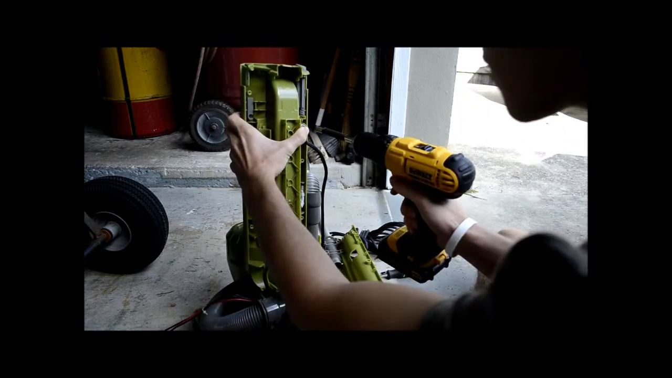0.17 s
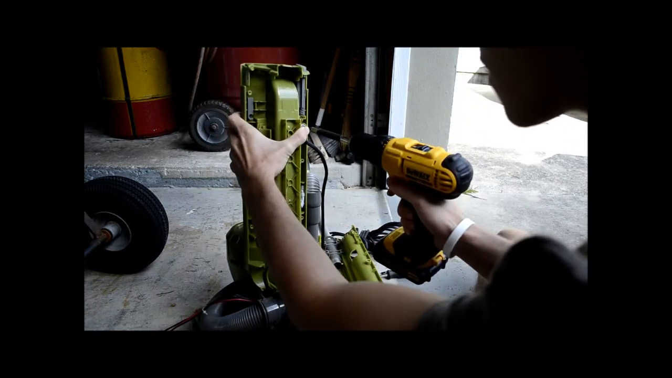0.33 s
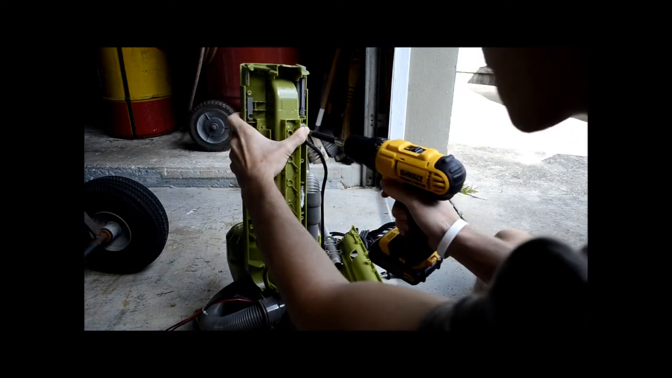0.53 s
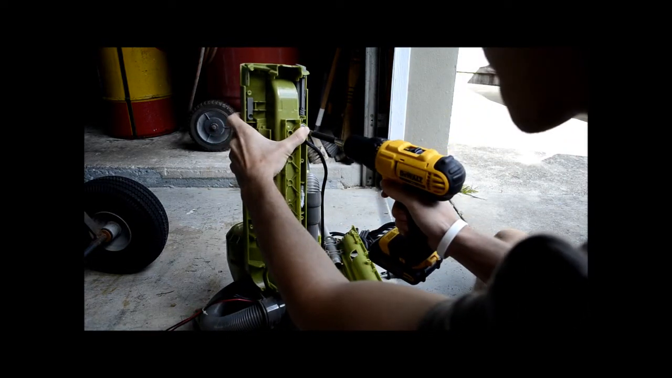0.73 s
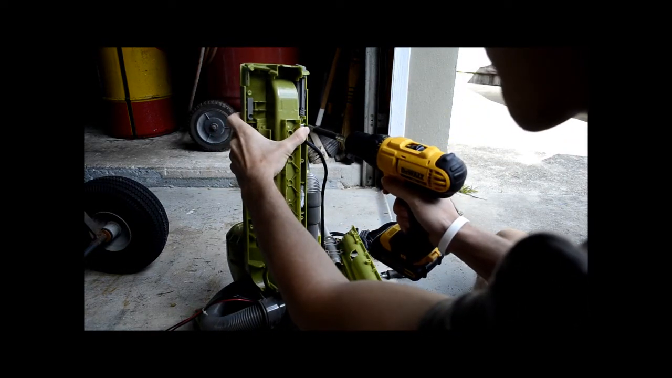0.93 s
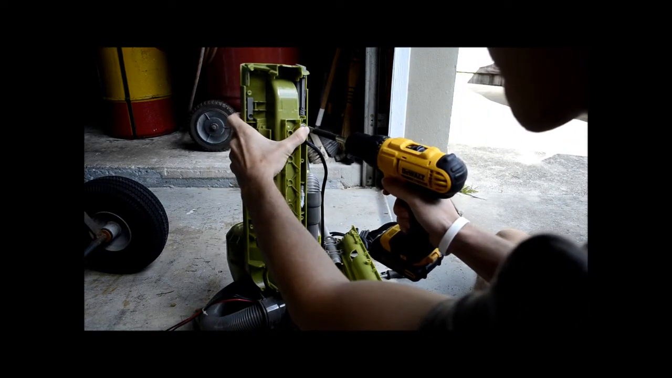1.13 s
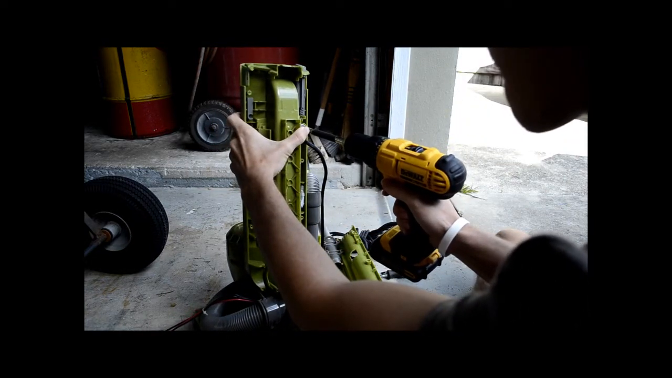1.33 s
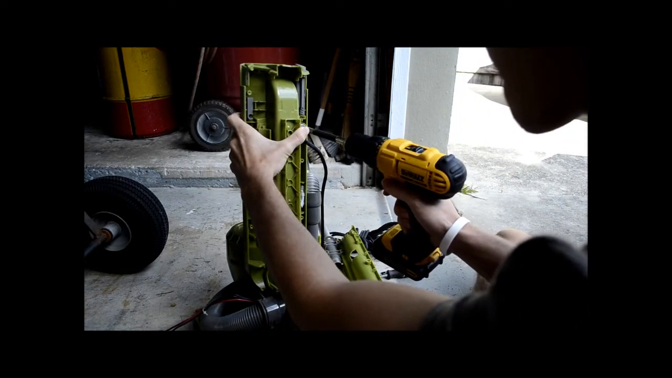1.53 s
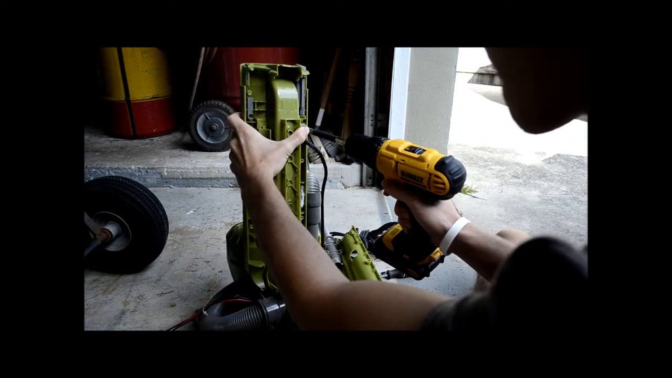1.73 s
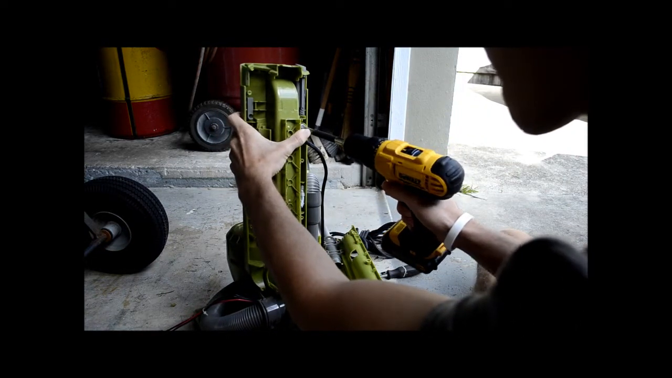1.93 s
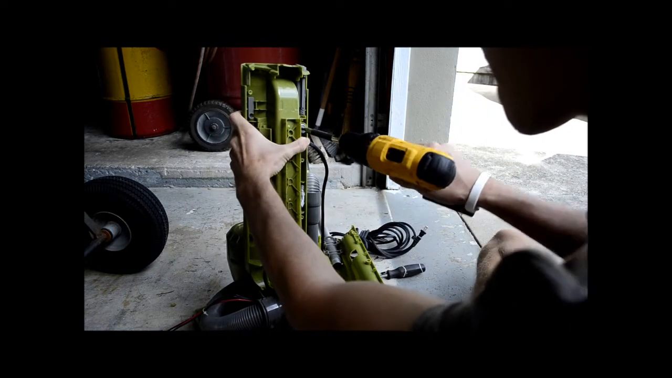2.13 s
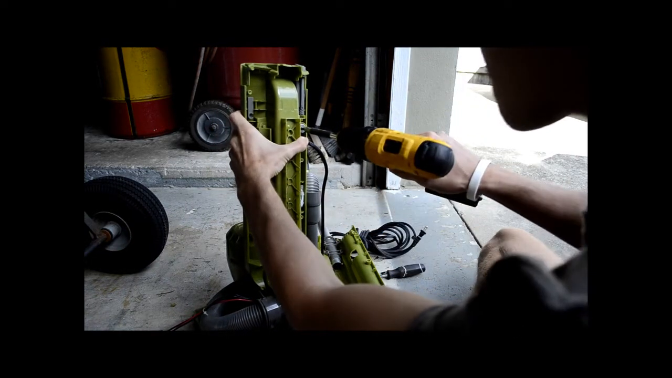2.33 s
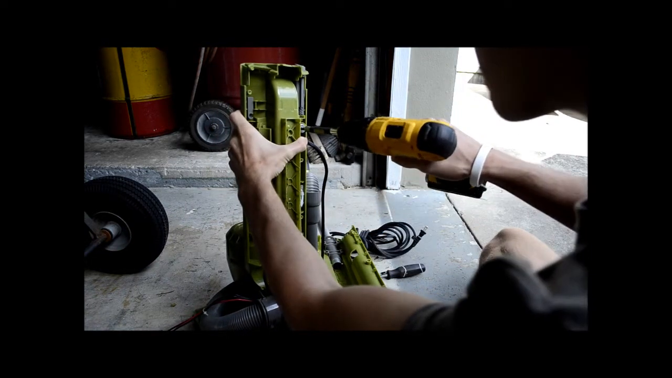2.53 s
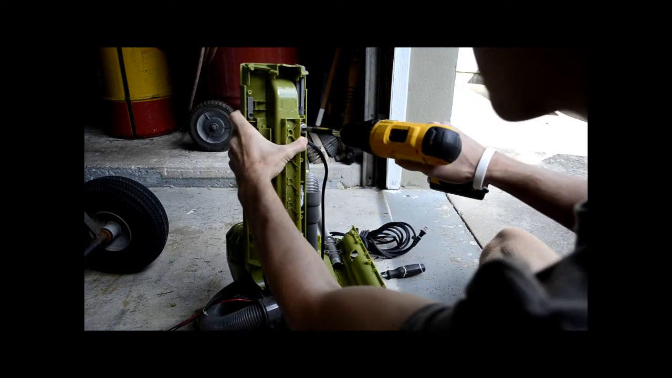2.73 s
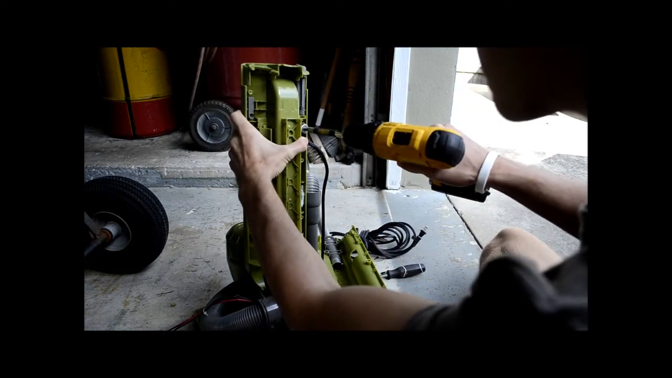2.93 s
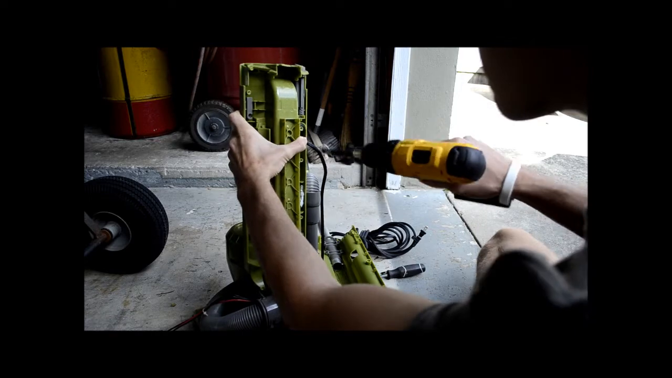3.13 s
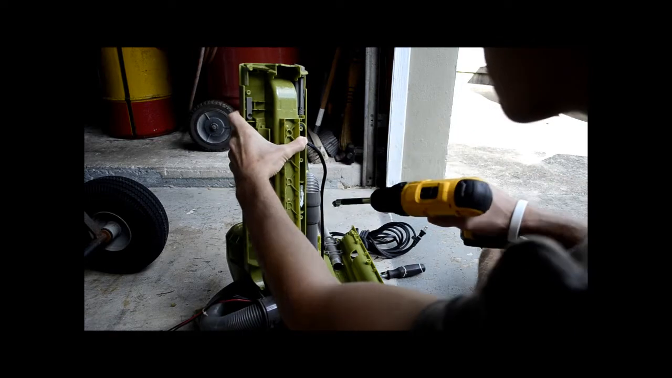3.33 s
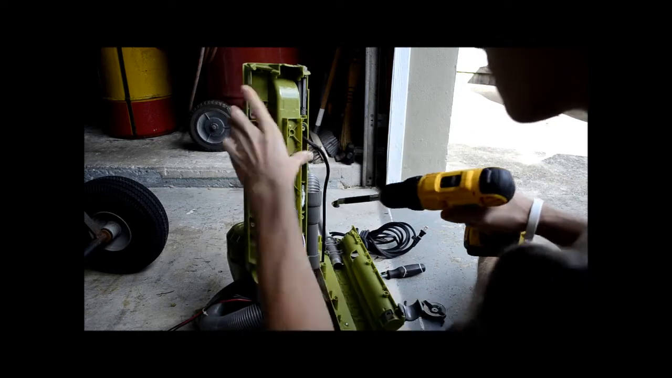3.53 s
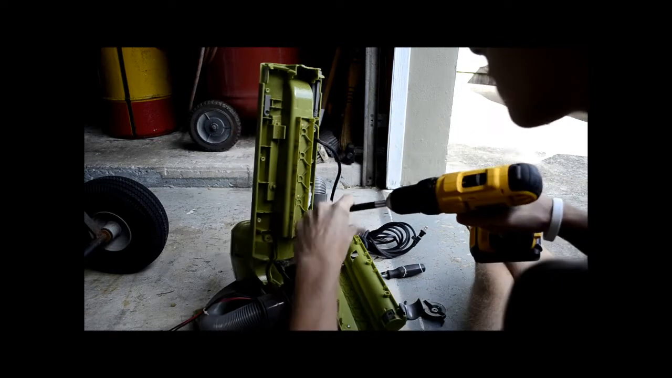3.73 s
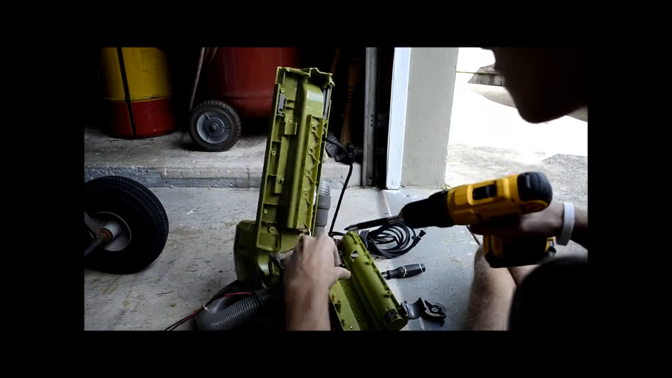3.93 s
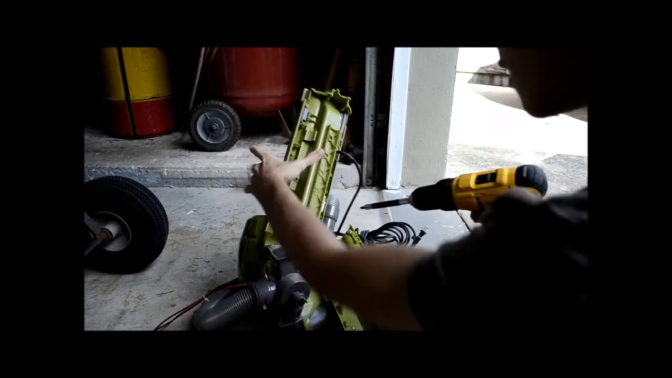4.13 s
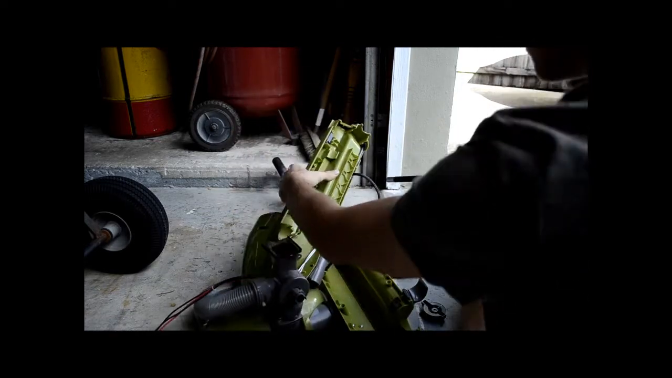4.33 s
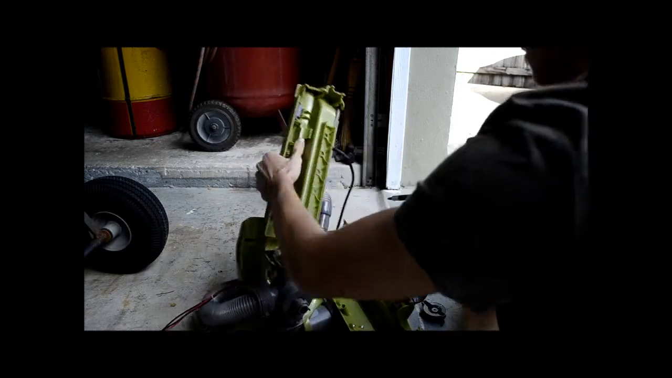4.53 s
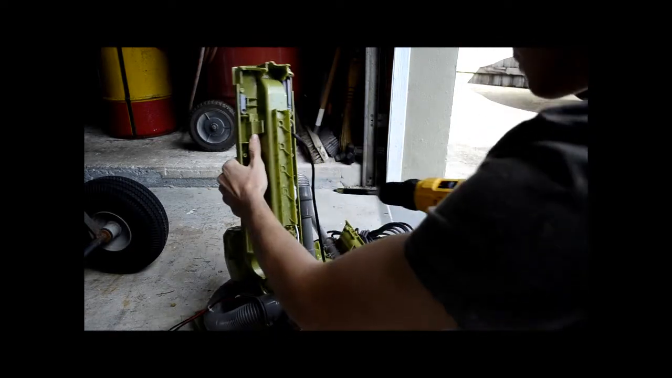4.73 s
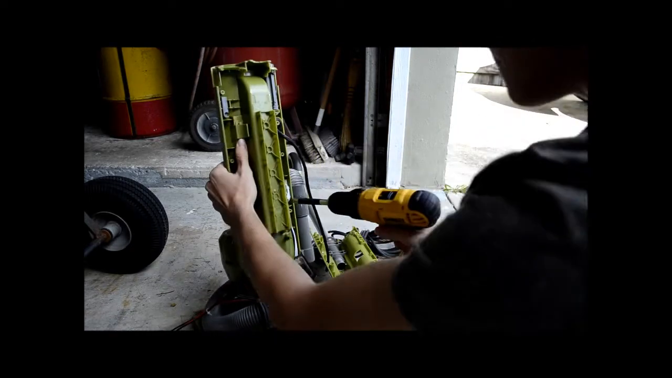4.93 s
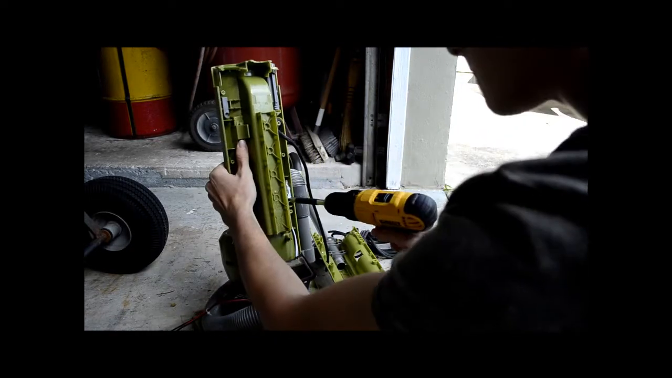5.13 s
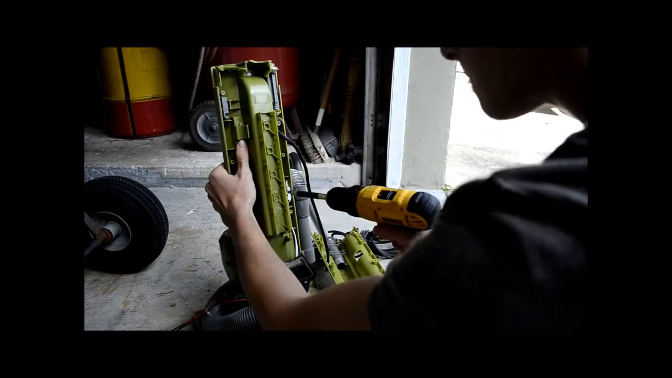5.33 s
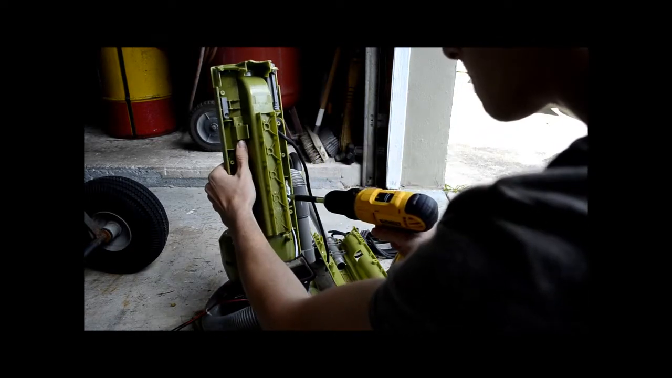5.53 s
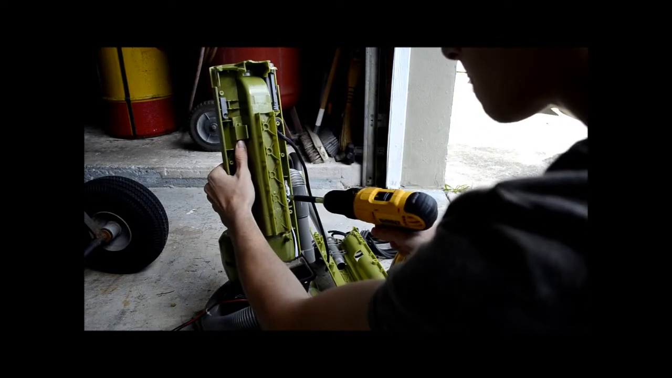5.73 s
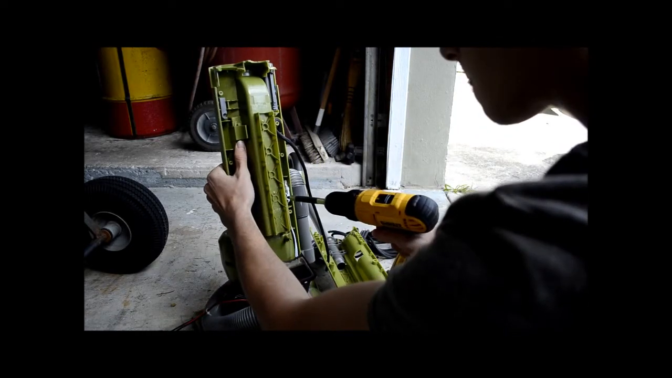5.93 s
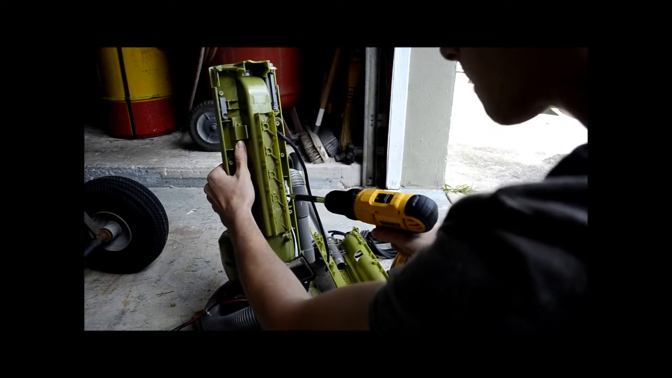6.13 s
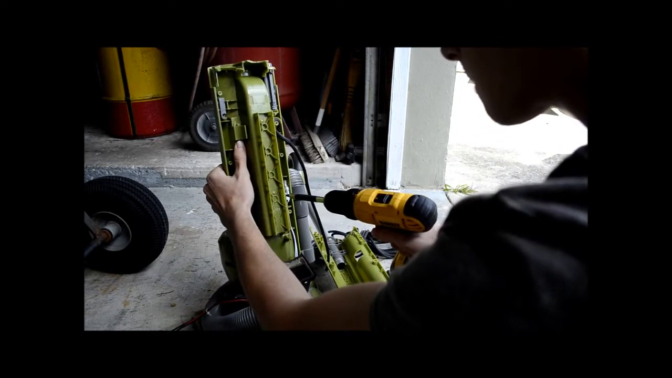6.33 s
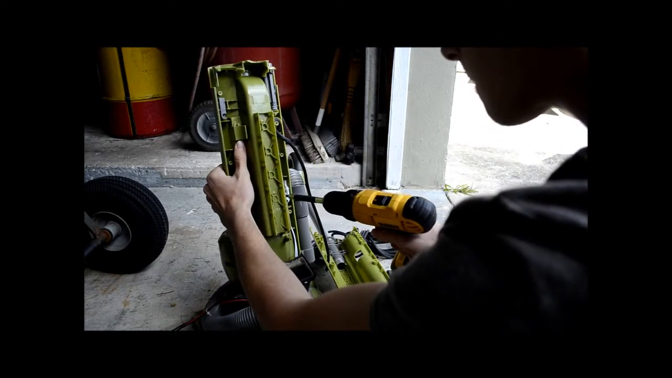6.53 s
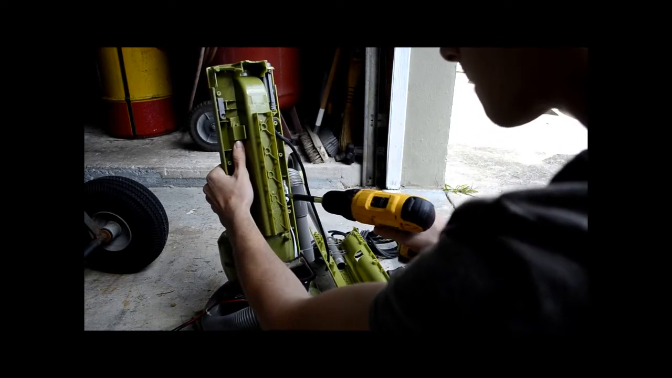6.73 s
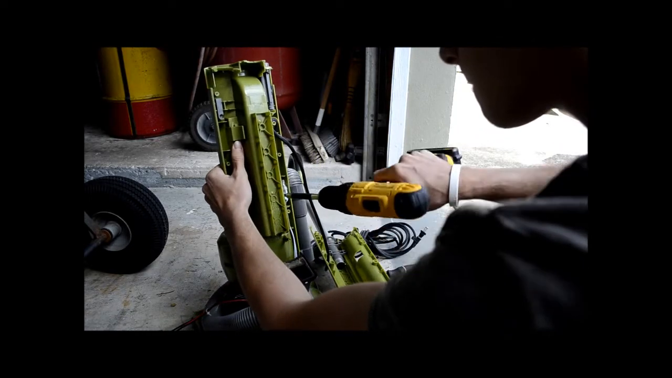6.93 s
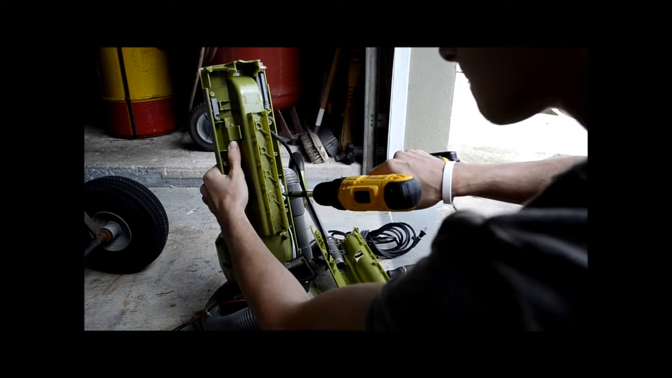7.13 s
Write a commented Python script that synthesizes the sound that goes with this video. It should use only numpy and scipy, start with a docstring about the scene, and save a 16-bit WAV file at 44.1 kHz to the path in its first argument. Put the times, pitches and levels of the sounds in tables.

```python
"""A cordless drill backs a screw out of a garden tool's plastic housing on a garage floor, in two bursts.
Its gear teeth rasp and its rotor sounds harmonics of the turning speed. The bit knocks about in the screw
heads, exciting the modes of the hollow housing. Between the bursts the housing is tipped: it scrapes over
the concrete by stick-slip friction and rattles a loose metal part. The garage reverberates briefly,
and a machine hums steadily behind it all, with outdoor air coming through the open door."""
import sys
import numpy as np
from scipy import signal
from scipy.fft import rfft, irfft
from scipy.io import wavfile
from scipy.ndimage import uniform_filter1d, map_coordinates

SR = 44100
rng = np.random.default_rng(int(sys.argv[2]) if len(sys.argv) > 2 else 0)


def pcm_store(signal):
    """Save signal as 16-bit PCM."""
    levels = np.round(np.clip(np.atleast_2d(signal), -1, 1) * 32767)
    wavfile.write(sys.argv[1], SR, levels.astype(np.int16).T)


N = 316197
TIME = np.arange(N) / SR


# Trigger pulls: pressed_s, released_s, squeeze_s, time_constant_s, gear_db, whine_re_gear_db, controller_db
TRIGGER_PULLS = [(2.452, 2.992, .004, .055, -29, -12, -38), (7.004, 7.4, 0.063, 0.061, -29.5, -6.5, -47.5)]

def motor(top_turns_per_s=325, ease_s=.12, sag_turns_per_s2=390, brake_s=.05, grind_db=3, idle_share=.46):
    """First-order lag: the rotor nears top speed, sags as the finger eases, then brakes with a grind."""
    turns_per_s, gain = 0, 0
    for pressed, released, squeeze_s, time_constant_s, gear_db, *_ in TRIGGER_PULLS:
        since = np.maximum(TIME - pressed, 0)
        rise = top_turns_per_s * (1 - np.exp(-since / time_constant_s))
        sag = sag_turns_per_s2 * np.maximum(TIME - released + ease_s, 0)
        unbraked = np.clip(1 - (TIME - released) / brake_s, 0, 1)
        speed = np.maximum(rise - sag, 0) * unbraked
        squeeze = np.minimum(since / squeeze_s, 1)
        drive = squeeze * np.sqrt(unbraked) * from_db(gear_db + grind_db * (TIME > released))
        turns_per_s += speed
        gain += drive * (idle_share + (1 - idle_share) * (speed / top_turns_per_s) ** 2)
    return turns_per_s, gain


# Tones of rotor, gears and commutator: cycles_per_turn, level_re_gear_db
ROTOR_ORDERS = [(3, -18), (4, -16), (5, -13), (7, -21), (12, -22), (16, -26), (20, -29), (24, -31),
                (26, -27), (31, -25), (32, -29), (35, -29), (41, -35)]
# Spectrum of the tooth impacts: frequency_hz, gain_db
GEAR_SPECTRUM = [(200, -23), (320, -17), (550, -10), (750, -15.5), (1000, -7), (1250, -13.5), (1700, -9),
                 (2200, -7), (3500, -16.5), (5000, -17), (6000, -22.5), (10500, -19.5), (13000, -26),
                 (16000, -36)]
# Resonances of the drill's casing, gearbox and rotor: centre_hz, bandwidth_hz, gain_db
CASING_MODES = [(1290, 230, -3), (1510, 79, 5), (2620, 330, -7.5), (3190, 70, 5), (3730, 60, -22),
                (4970, 480, -6), (8700, 90, -9.5)]
GEARBOX_MODES = [(1405, 30, 18.5)]
ROTOR_MODES = [(10062, 90, 5)]

def drill(rasp_db=-5, throb=0.06, flutter=0.18):
    """Forced vibration: gear teeth shake the casing; one rotor harmonic squeals as it meets a resonance."""
    turns_per_s, gain = motor()
    angle = phase_of(turns_per_s * (1 + .0016 * drift(120)))
    mesh = np.maximum(np.cos(4 * angle), 0) ** 2
    impacts = 2 * mesh * grains(per_s=9000, spread_db=2.1)
    teeth = (impacts + from_db(rasp_db) * rng.standard_normal(N)) * (1 + throb * np.cos(angle))
    gears = rms_one(resonate(colour(teeth, GEAR_SPECTRUM), CASING_MODES + GEARBOX_MODES))
    tones = sum(from_db(db) * np.sqrt(2) * np.sin(order * angle) * (1 + flutter * drift(35))
                for order, db in ROTOR_ORDERS)
    return gain * (gears + resonate(tones, ROTOR_MODES))


def gear_strain(overtone_db=-9, width_hz=1300, full_strain_turns_per_s2=1200):
    """Inertial load: accelerating gears add a rising whine, made raspy by random modulation."""
    turns_per_s, gain = motor()
    acceleration = np.clip(np.gradient(turns_per_s) * SR / full_strain_turns_per_s2, 0, 1)
    pulled = sum(from_db(whine_db) * (TIME >= pressed) * (TIME < released)
                 for pressed, released, *_, whine_db, _ in TRIGGER_PULLS)
    strain = uniform_filter1d(np.sqrt(acceleration) * pulled, size=600)
    mesh_phase = phase_of(12 * turns_per_s)
    whine = 0
    for k in (1, 2):
        partial = drift(width_hz) * np.cos(k * mesh_phase) + drift(width_hz) * np.sin(k * mesh_phase)
        whine += from_db(overtone_db * (k - 1)) * partial
    return gain * strain * whine


def controller(chop_hz=3905, attack_s=0.0032, t60_s=0.11):
    """Magnetic force: chopped current makes the windings sing briefly at the start of each pull."""
    envelope = 0
    for pressed, *_, db in TRIGGER_PULLS:
        since = np.maximum(TIME - pressed, 0)
        envelope += np.minimum(since / attack_s, 1) * from_db(db - 60 * since / t60_s)
    return envelope * three_harmonics(2 * np.pi * chop_hz * TIME, step_db=-16)


# The spindle takes up its play, then clacks when braked: start_s, level_db, hardness_db
SPINDLE_CLACKS = [(2.4655, -29.5, -2), (2.9925, -19, -0.5), (2.9965, -29, 8), (3.0105, -36, -6),
                  (3.018, -23.5, -8)]

def spindle():
    """Backlash: the steel dogs of the spindle lock hit their stops with short, hard clacks."""
    clacks = by_hardness(SPINDLE_CLACKS, thud_db=-17.5, snap_db=-13.5)
    return contacts(clacks, thud_hz=330, body_hz=875, bright_hz=2380, snap_hz=4900,
                    t60_s=0.027, snap_t60_s=.035, crack=0.99, snap_ratio=2.1)


# Bit, hand and floor knock the plastic: start_s, relative_level_db, hardness_db
PLASTIC_KNOCKS = [(0.4884, -35, -6.5), (0.9648, -42.5, 5.5), (1.3005, -44.5, -6), (1.4003, -47, -4),
                  (1.6233, -46, -3), (2.113, -39, 3), (2.1202, -30, 3), (2.8045, -25, -2), (3.1, -45, -11),
                  (3.4088, -48.5, 4), (3.686, -48, -8), (3.7889, -49, 5), (3.9675, -43.5, 16),
                  (4.08, -38.5, 5), (4.1585, -38, 7), (4.2204, -24.5, -3.5), (4.413, -27, -2),
                  (4.8051, -38, -11), (4.817, -34, -7), (5.4032, -36.5, -5), (5.5319, -49.5, -3),
                  (6.2109, -37.5, -2.5), (6.385, -47.5, -4), (6.5766, -45, 7.5), (6.772, -36, -1),
                  (6.7791, -37, 2), (6.802, -41.5, -12), (6.8938, -39.5, 10)]
# Resonances of the hollow housing: centre_hz, bandwidth_hz, gain_db
HOUSING_MODES = [(400, 33, -14), (559, 50, -9), (710, 153, 4), (1050, 210, 1.5), (1343, 43, 4.5),
                 (1640, 74, 1), (2500, 58, -16), (2940, 86, -7), (3530, 110, -5), (4220, 90, -12)]

def plastic(gain_db=-2.5, ticks_per_s=1.5, tick_db=-56, spread_db=3):
    """Impact excitation: knocks and faint ticks of the shifting grip ring the housing's damped modes."""
    chance = rng.random((int(ticks_per_s * N / SR), 2))
    ticks = [(when * N / SR, tick_db + spread_db * (2 * size - 1), 0) for when, size in chance]
    hits = by_hardness(PLASTIC_KNOCKS + ticks, thud_db=-6, snap_db=-17)
    knocks = contacts(hits, thud_hz=249, body_hz=800, bright_hz=2290, snap_hz=4005,
                      t60_s=0.075, snap_t60_s=0.064, crack=2.48, snap_ratio=2.65)
    return from_db(gain_db) * resonate(knocks, HOUSING_MODES)


# The loose metal part strikes: start_s, level_db, thud_re_level_db, snap_re_level_db, ping_hz, ping_db
METAL_STRIKES = [(4.097, -27, -26, -14, 4210, -28.5), (4.3347, -37.5, 7, 0, 10220, -28),
                 (4.4571, -16.5, -12.5, -7.5, 7470, -32), (4.5586, -33.5, -13, -12, 3470, -32),
                 (4.582, -30, -24, -17, 3430, -44), (4.6423, -33.5, -13, -13, 3230, -49),
                 (4.6856, -37.5, 5, -16.5, 3400, -53), (4.7579, -40, -7, -17.5, 3770, -45)]
# Modes of the whole part: pitch_hz, relative_level_db, t60_s
METAL_MODES = [(680, -10, .3), (769, -9, 0.11), (967, -12, .35), (1057, -8, .27), (1364, -23, .5),
               (1680, -15.5, .5), (1800, -10, 0.42), (2260, -25.5, 0.54), (2540, -12, .25),
               (2880, -15, 0.25), (3380, -23, .5), (3560, -13.5, 0.34), (4300, -20.5, 0.33),
               (5270, -22.5, 0.22)]

def metal(ring_db=-5, scatter_db=2.5, ping_cycles=250, ping_split=0.04):
    """Free vibration: each struck spot pings with a close pair of modes and the whole part rings on."""
    out = contacts([row[:4] for row in METAL_STRIKES], thud_hz=301, body_hz=776, bright_hz=3500,
                   snap_hz=6910, t60_s=0.079, snap_t60_s=0.04, crack=0.89, snap_ratio=1.66)
    for start_s, *_, ping_hz, ping_db in METAL_STRIKES:
        click, t60_s = clicks_at(start_s, ping_db), ping_cycles / ping_hz
        out += ring(click, ping_hz * (1 - ping_split), t60_s)
        out -= ring(click, ping_hz * (1 + ping_split), t60_s)
    starts_s, levels_db, *_ = np.transpose(METAL_STRIKES)
    for hz, mode_db, t60_s in METAL_MODES:
        excitation_db = levels_db + mode_db + ring_db + scatter_db * rng.standard_normal(len(starts_s))
        out += ring(clicks_at(starts_s, excitation_db), hz, t60_s)
    return out


# The housing slides over the concrete: start_s, swell_s, peak_db, t60_s
HOUSING_SLIDES = [(4.158, 0.078, -18, 0.26), (4.409, 0.026, -22.5, 0.11)]
# Spectrum of the friction: frequency_hz, gain_db
FRICTION_SPECTRUM = [(130, -23.5), (230, -2.5), (330, -3.5), (500, -8.5), (700, 5), (1100, -1.5),
                     (1600, -5), (2500, -11), (3500, -17), (6000, -31), (10000, -36.5), (15000, -48.5)]
# Resonances of the whole garden tool: centre_hz, bandwidth_hz, gain_db
TOOL_MODES = [(396, 39, -2), (714, 19, 3.5), (794, 19.8, -29.5), (1020, 100, 4), (1394, 77, 9),
              (1673, 19, -1)]

def scrape(grit_db=-6, swell_db=13.5):
    """Stick-slip friction: plastic catches on gritty concrete and shakes the tool, swelling and dying."""
    push = 0
    for start_s, swell_s, peak_db, t60_s in HOUSING_SLIDES:
        past_peak = TIME - start_s - swell_s
        envelope_db = np.minimum(swell_db * past_peak / swell_s, -60 * past_peak / t60_s)
        push += (TIME >= start_s) * from_db(peak_db + envelope_db)
    slips = grains(per_s=1600, spread_db=2.58) + from_db(grit_db) * rng.standard_normal(N)
    return push * rms_one(resonate(colour(slips, FRICTION_SPECTRUM), TOOL_MODES))


def judder(start_s=4.11, length_s=0.16, peak_db=-40.5, start_hz=150.5, rise_hz_per_s=179, jitter=0.0366):
    """Relaxation oscillation: the housing's foot sticks and slips ever faster, making a low groan."""
    since = np.clip(TIME - start_s, 0, length_s)
    slip_hz = (start_hz + rise_hz_per_s * since) * (1 + jitter * drift(60))
    arch = np.sin(np.pi * since / length_s)
    return from_db(peak_db) * arch * rms_one(three_harmonics(phase_of(slip_hz), step_db=-8))


# Reverberation time of the garage: frequency_hz, t60_s
GARAGE_DECAY = [(200, 0.33), (1000, 0.33), (4000, 0.25), (12000, 0.21)]

def garage(x, wet_db=-8, build_s=0.0028):
    """Reverberation: diffuse reflections build up and decay exponentially, sooner in the treble."""
    t, response = np.arange(SR * 3 // 4) / SR, 0
    edges_hz = np.geomspace(125, 16000, 8)
    for low, high in zip(edges_hz, edges_hz[1:]):
        t60_s = at_hz(GARAGE_DECAY, np.sqrt(low * high))
        response += band(rng.standard_normal(len(t)), low, high) * from_db(-60 * t / t60_s)
    response *= np.minimum(t / build_s, 1)
    return x + from_db(wet_db) * signal.fftconvolve(x, response / np.linalg.norm(response))[:N]


# Partials of the humming machine: pitch_hz, level_db, unsteadiness_ratio
HUM_PARTIALS = [(65.8, -61, 0.79), (81, -61, 0.53), (89.3, -49.5, 0.097), (118.8, -57.5, 0.46),
                (292.2, -61, 0.64), (628, -60, 0.94)]

def machine_hum():
    """Random modulation: each partial of the hum wavers in amplitude and phase."""
    hum = 0
    for hz, db, unsteadiness in HUM_PARTIALS:
        waver = 1 + unsteadiness * (drift(9.6) + 1j * drift(8))
        hum += from_db(db) * rms_one(np.real(waver * np.exp(2j * np.pi * hz * TIME)))
    return hum


# Spectrum of the outdoor air: frequency_hz, gain_db
AIR_SPECTRUM = [(82, -36), (140, -7), (177, -4.5), (216, -9), (295, -3), (429, -8.5), (464, -2.5),
                (502, -7), (623, -5), (853, -2), (3440, -25.5), (4100, -30), (5840, -37.5), (11500, -40),
                (15300, -48)]
# Its slow rise and fall: time_s, level_db
AIR_LEVELS = [(0, -47), (4.7, -46.5), (5.4, -49), (7.17, -47)]

def outdoors(drone_db=-54.5, drone_peak_s=5.8, drone_width_s=0.98, rumble_db=-63):
    """Filtered noise: broadband outdoor air, a distant narrowband drone that swells, and a low rumble."""
    air_db = np.interp(TIME, *np.transpose(AIR_LEVELS))
    air = from_db(air_db) * rms_one(colour(rng.standard_normal(N), AIR_SPECTRUM))
    swell = 1 / (1 + ((TIME - drone_peak_s) / drone_width_s) ** 2)
    drone = from_db(drone_db) * swell * rms_one(band(rng.standard_normal(N), 160, 189))
    rumble = from_db(rumble_db) * rms_one(band(rng.standard_normal(N), 30, 107.4))
    return air + drone + rumble


# Tones of a high background whine: pitch_hz, level_db
WHINE_TONES = [(4081, -81), (15671, -80)]

def faint_whine():
    """Pure tones: two steady sinusoids make a faint, high whine."""
    return sum(from_db(db) * np.sqrt(2) * np.sin(2 * np.pi * hz * TIME) for hz, db in WHINE_TONES)


def by_hardness(rows, thud_db, snap_db, thud_loss=0.3):
    """Contact stiffness: harder hits snap more and thud less. Gives start_s, level_db, thud_db, snap_db."""
    return [(s, db, thud_db - thud_loss * hardness, snap_db + hardness) for s, db, hardness in rows]


def contacts(rows, thud_hz, body_hz, bright_hz, snap_hz, t60_s, snap_t60_s, crack, snap_ratio):
    """Impact transients: a crack and a dying clatter in three bands, low thud, middle body, high snap."""
    out, t = np.zeros(N + SR), np.arange(SR // 8) / SR
    span = .015 * SR  # a level is the rms of the band's energy spread over 15 ms
    spike = crack * np.exp(-t / 0.00027)
    for start_s, db, thud_db, snap_db in rows:
        thud, body, snap = [rng.standard_normal(len(t)) * (from_db(-60 * t / decay_s) + spike)
                            for decay_s in (t60_s, t60_s, snap_t60_s)]
        thud = band(thud, thud_hz, body_hz)
        body = band(band(body, body_hz, bright_hz), body_hz / 2, 2 * bright_hz)
        snap = band(snap, max(snap_hz / snap_ratio, bright_hz), snap_hz * snap_ratio)
        start = int(start_s * SR)
        for part, level_db in [(thud, db + thud_db), (body, db), (snap, db + snap_db)]:
            out[start:start + len(t)] += from_db(level_db) * part * np.sqrt(span / np.sum(part ** 2))
    return out[:N]


def resonate(x, modes):
    """Resonance: a body passes the sound and lifts it around each mode."""
    out = x.copy()
    for hz, width_hz, db in modes:
        r = np.exp(-np.pi * width_hz / SR)
        feedback = [1, -2 * r * np.cos(2 * np.pi * hz / SR), r * r]
        out += from_db(db) * signal.lfilter(np.array([1, 0, -1]) * (1 - r * r) / 2, feedback, x + 1e-18)
    return out


def ring(clicks, hz, t60_s):
    """Damped oscillator: a unit click starts a decaying sine of height 1."""
    r, w = from_db(-60 / (t60_s * SR)), 2 * np.pi * hz / SR
    return signal.lfilter([0, np.sin(w)], [1, -2 * r * np.cos(w), r * r], clicks + 1e-18)


def clicks_at(start_s, db):
    """Impulses at given times and levels."""
    out = np.zeros(N)
    out[(np.asarray(start_s) * SR).astype(int)] = from_db(db)
    return out


def grains(per_s, spread_db):
    """Shot noise: random tiny impacts of uneven size; rms 1."""
    sizes = from_db(spread_db * np.minimum(rng.exponential(1, N), 3)) * rng.choice([-1, 1], N)
    return rms_one(sizes * (rng.random(N) < per_s / SR))


def drift(rate_hz):
    """Smooth random fluctuation; rms 1."""
    knots = rng.standard_normal(int(rate_hz * N / SR) + 4)
    return rms_one(map_coordinates(knots, [TIME * rate_hz + 1], order=3))


def three_harmonics(phase, step_db):
    """Harmonic series: three partials, changing by step_db from each to the next."""
    return sum(from_db(step_db * k) * np.sin((k + 1) * phase) for k in range(3))


def phase_of(hz):
    """Phase in radians is the integral of frequency."""
    return 2 * np.pi * np.cumsum(hz) / SR


def colour(x, spectrum):
    """Spectral shaping, falling away below the spectrum's first point."""
    hz = np.fft.rfftfreq(N, 1 / SR)
    return irfft(rfft(x) * from_db(at_hz(spectrum, hz)) * np.minimum(hz / spectrum[0][0], 1), N)


def band(x, low_hz, high_hz):
    """Gentle band-pass filter."""
    sections = signal.butter(2, [low_hz, min(high_hz, .45 * SR)], "band", fs=SR, output="sos")
    return signal.sosfilt(sections, x)


def at_hz(points, hz):
    """Interpolation on a log-frequency axis."""
    points_hz, values = np.transpose(points)
    return np.interp(np.log(np.maximum(hz, 1)), np.log(points_hz), values)


def from_db(db):
    """Decibels to amplitude ratio."""
    return 10 ** (np.asarray(db) / 20)


def rms_one(x):
    """Normalisation to rms 1."""
    return x / np.sqrt(np.mean(x ** 2) + 1e-20)


def scene():
    """Superposition: the reverberant work sounds add to the background, alike in both channels."""
    work = drill() + controller() + spindle() + plastic() + metal() + scrape() + judder() + gear_strain()
    mono = garage(work) + outdoors() + machine_hum() + faint_whine()
    return np.array([mono, mono])


def record(dry, cutoff_hz=16100):
    """Clipping and band limiting: peaks stop at full scale and a steep low-pass cuts the top."""
    low_pass = signal.ellip(10, .1, 80, cutoff_hz, fs=SR, output="sos")
    return signal.sosfilt(low_pass, np.clip(dry, -1, 1))


dry = scene()
out = record(dry)
pcm_store(out)
```